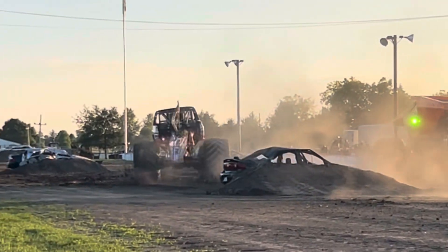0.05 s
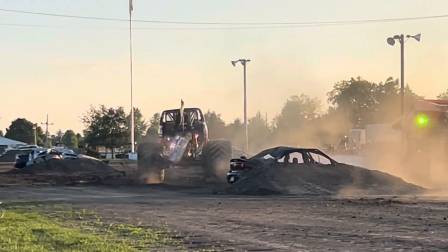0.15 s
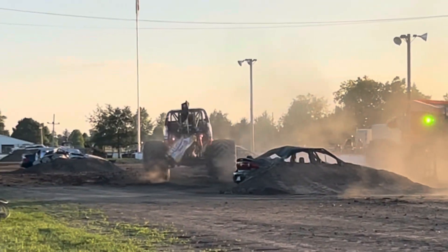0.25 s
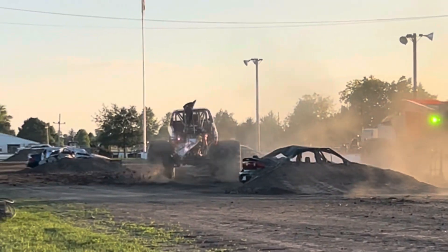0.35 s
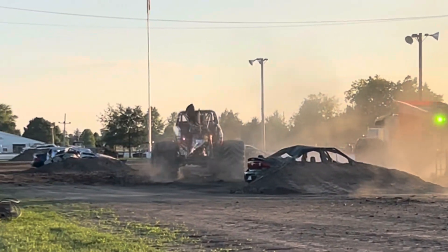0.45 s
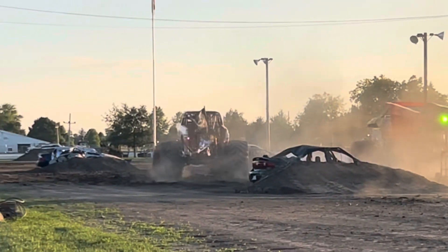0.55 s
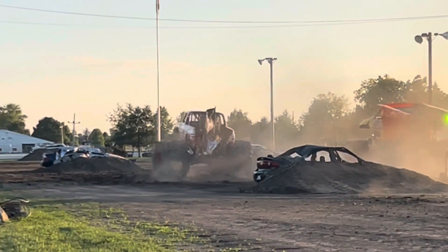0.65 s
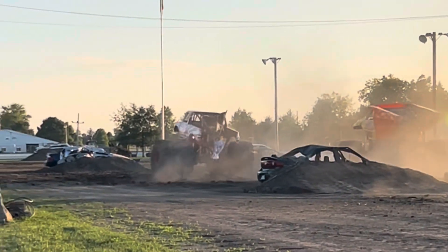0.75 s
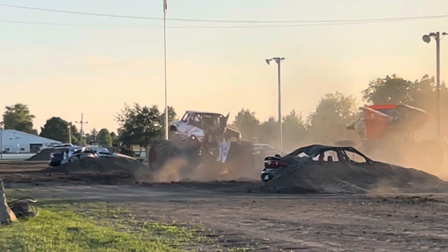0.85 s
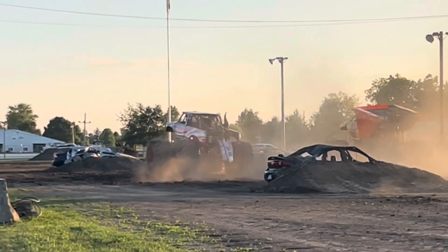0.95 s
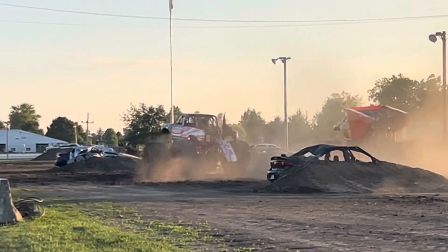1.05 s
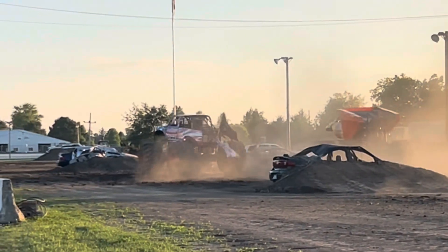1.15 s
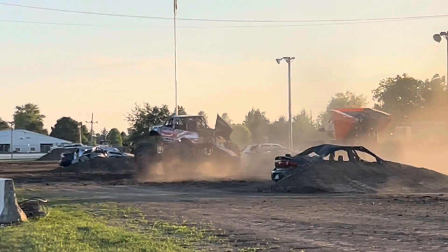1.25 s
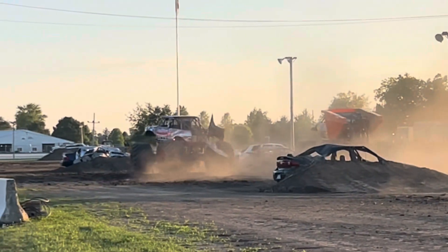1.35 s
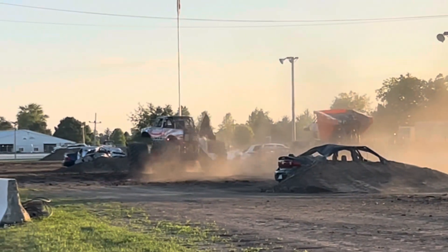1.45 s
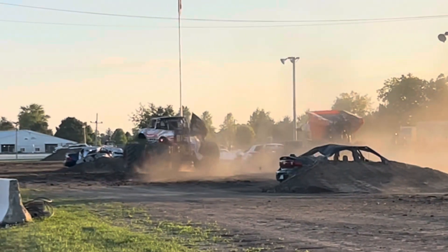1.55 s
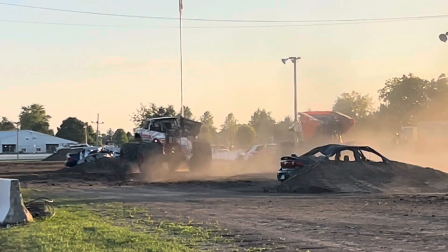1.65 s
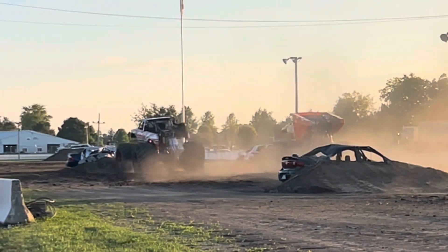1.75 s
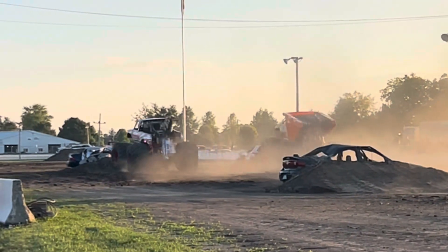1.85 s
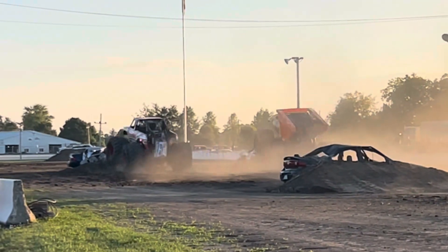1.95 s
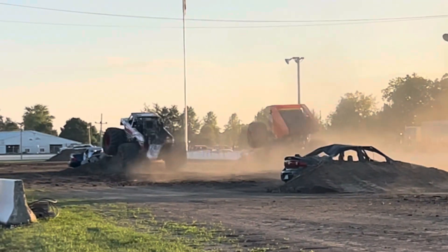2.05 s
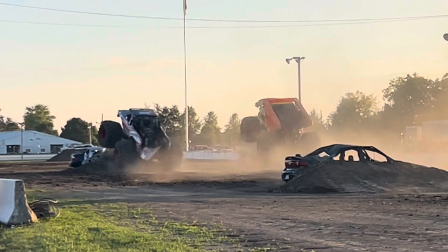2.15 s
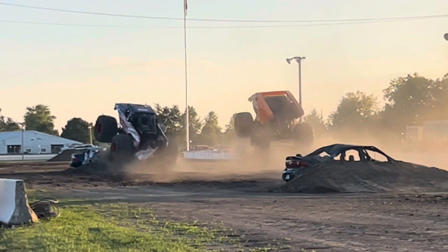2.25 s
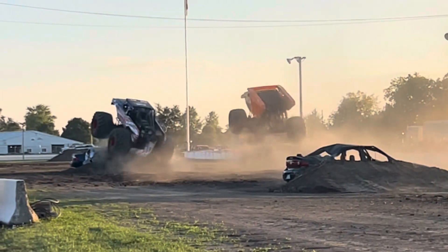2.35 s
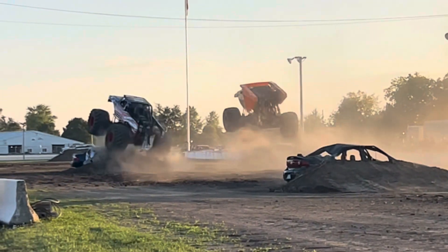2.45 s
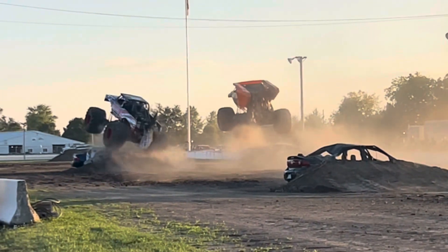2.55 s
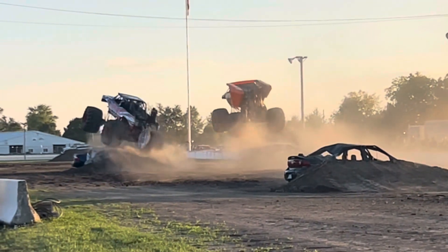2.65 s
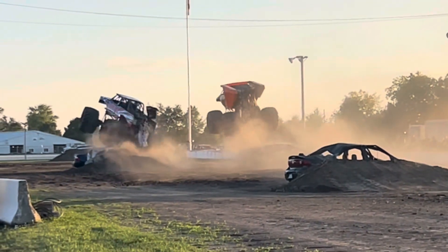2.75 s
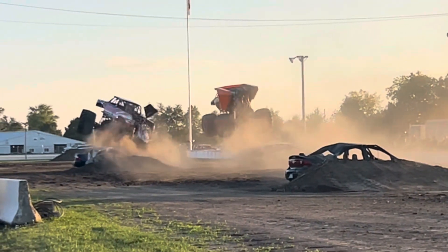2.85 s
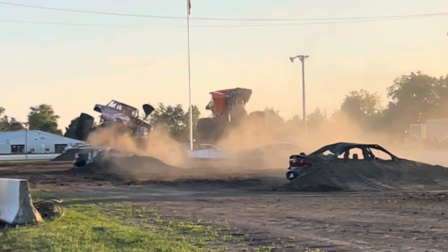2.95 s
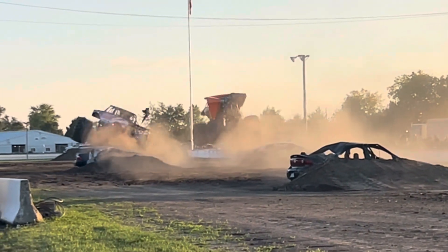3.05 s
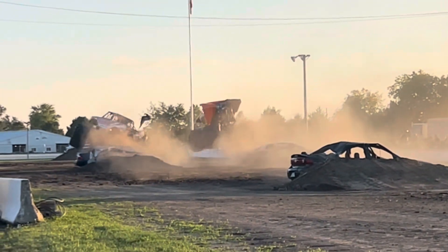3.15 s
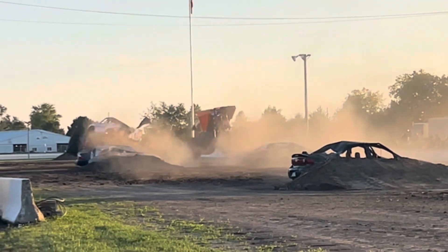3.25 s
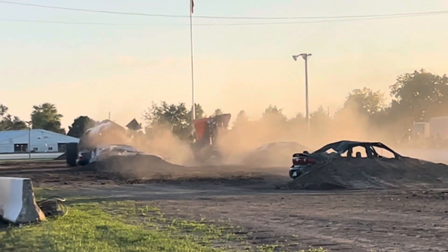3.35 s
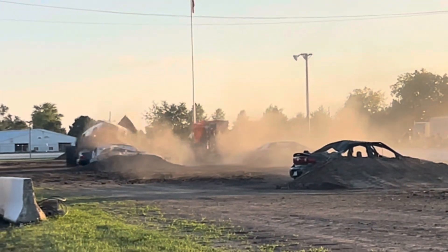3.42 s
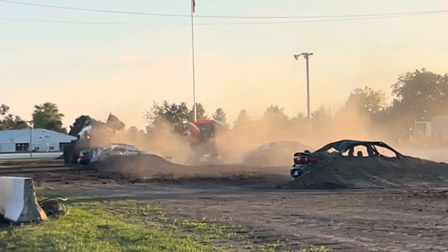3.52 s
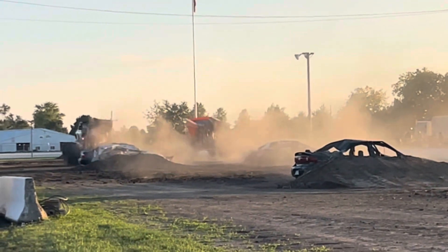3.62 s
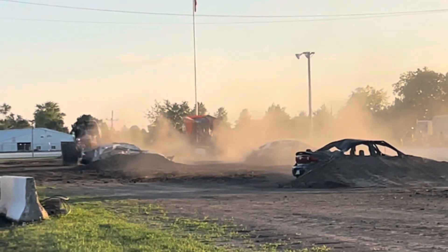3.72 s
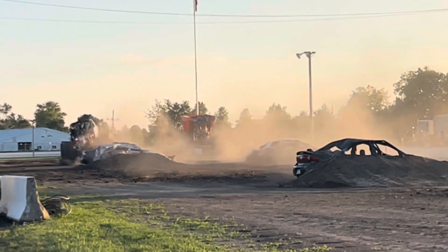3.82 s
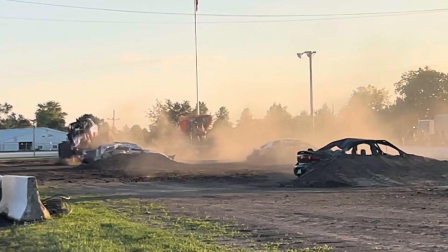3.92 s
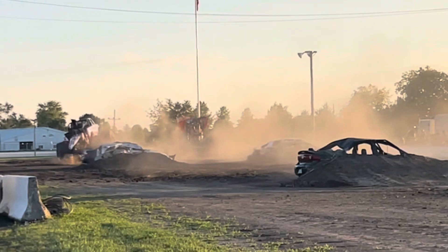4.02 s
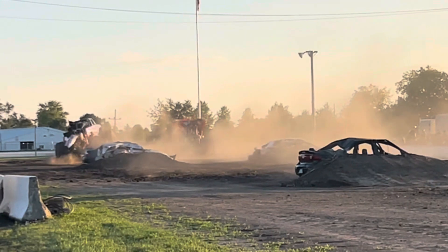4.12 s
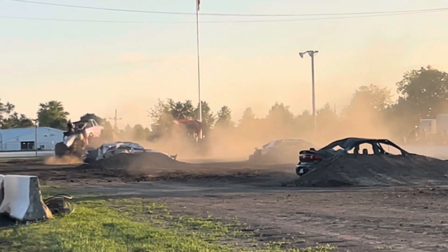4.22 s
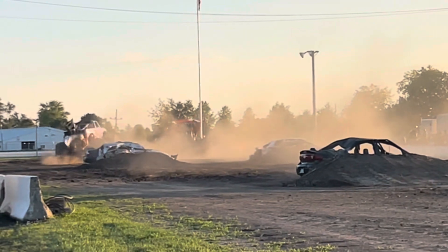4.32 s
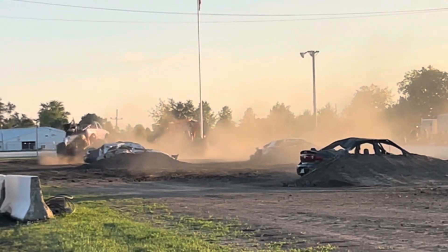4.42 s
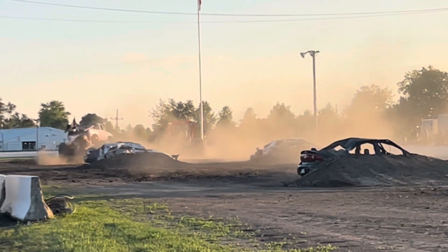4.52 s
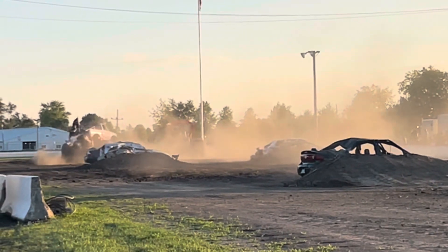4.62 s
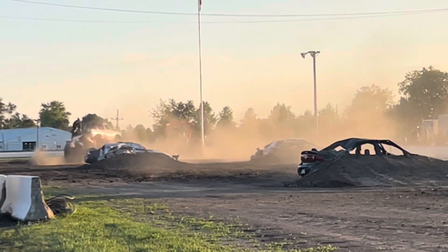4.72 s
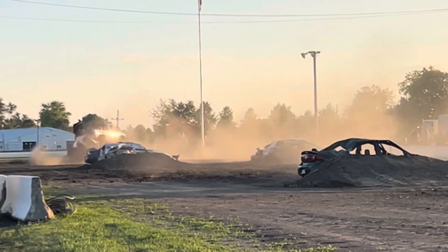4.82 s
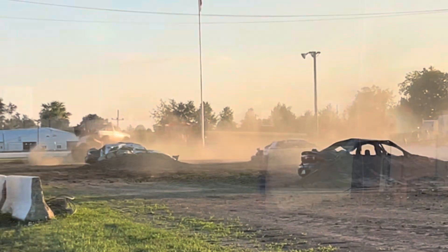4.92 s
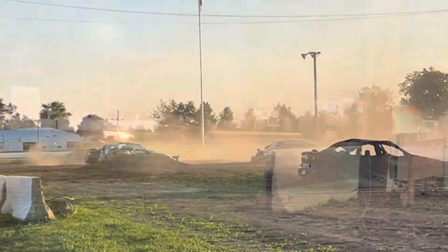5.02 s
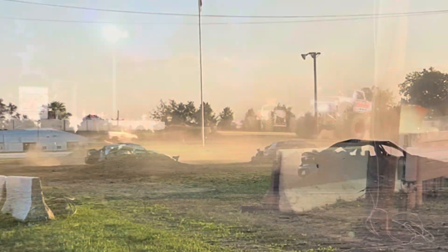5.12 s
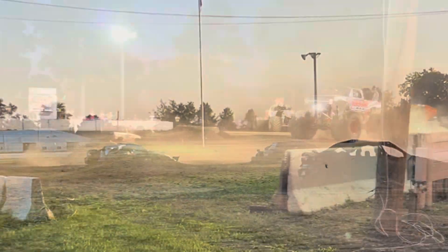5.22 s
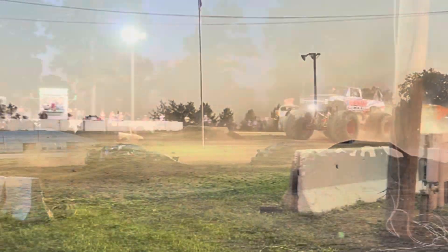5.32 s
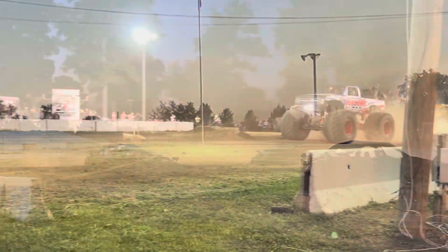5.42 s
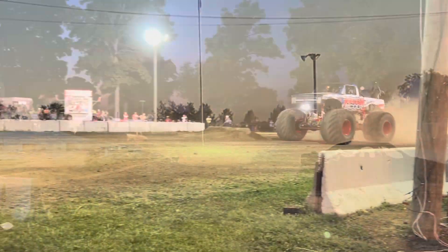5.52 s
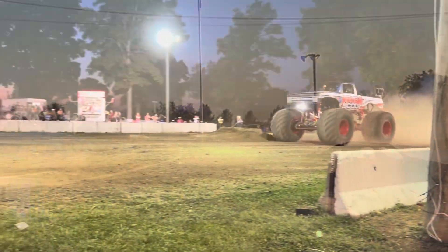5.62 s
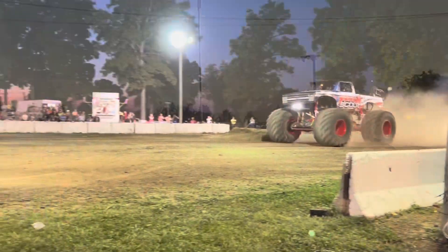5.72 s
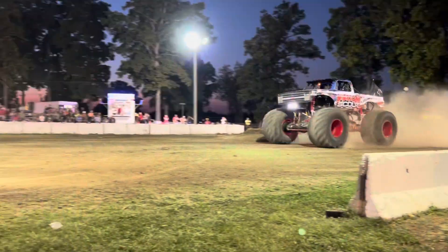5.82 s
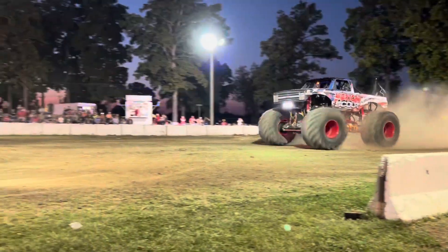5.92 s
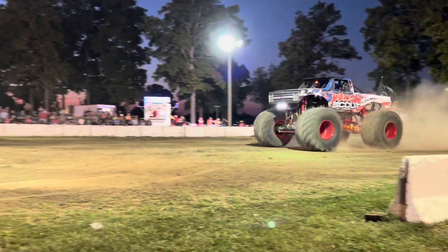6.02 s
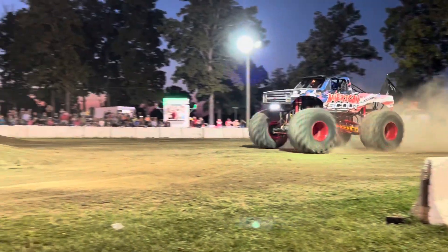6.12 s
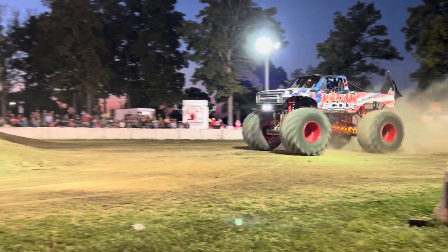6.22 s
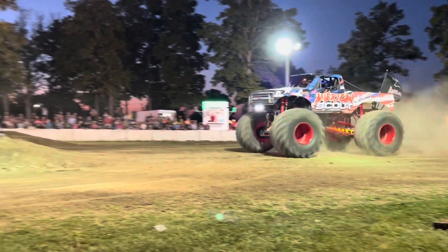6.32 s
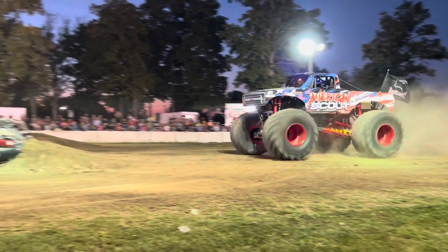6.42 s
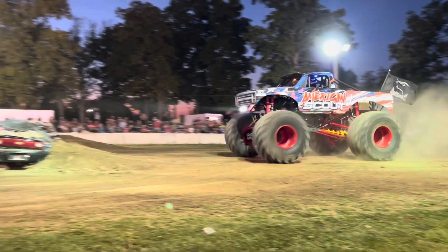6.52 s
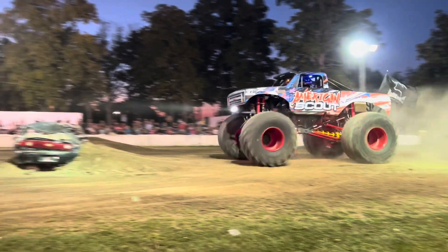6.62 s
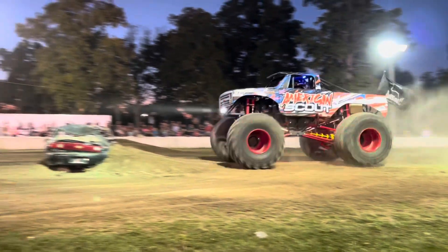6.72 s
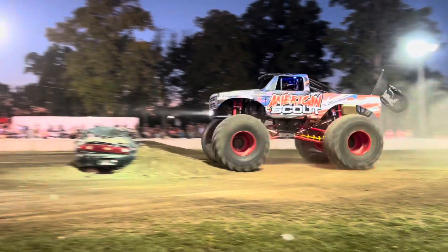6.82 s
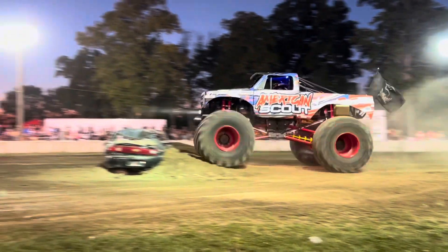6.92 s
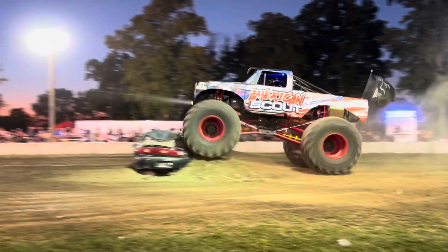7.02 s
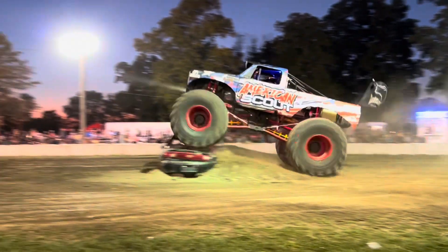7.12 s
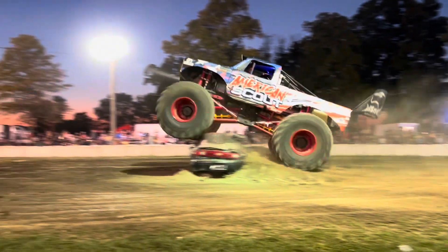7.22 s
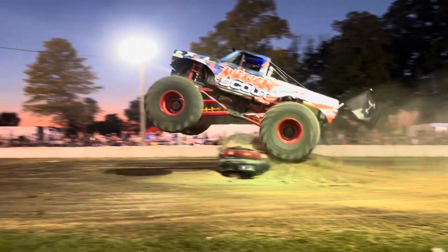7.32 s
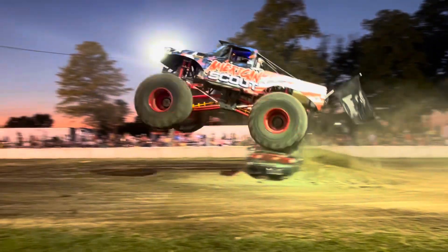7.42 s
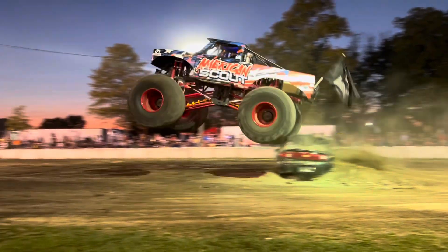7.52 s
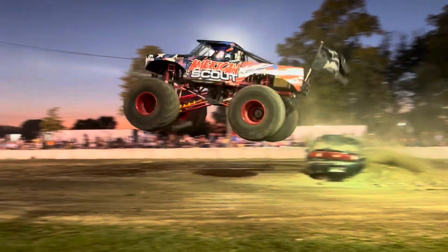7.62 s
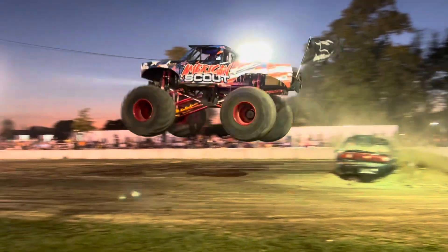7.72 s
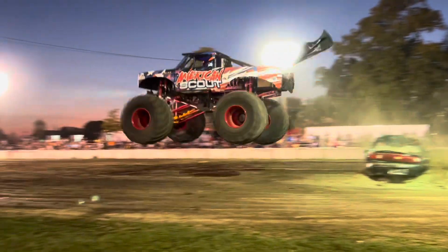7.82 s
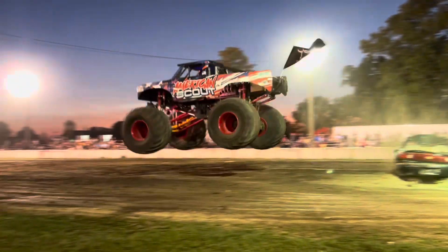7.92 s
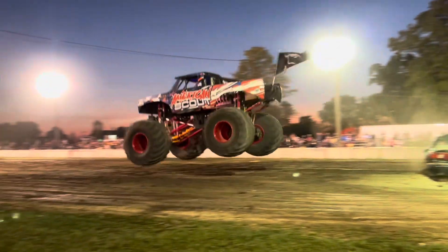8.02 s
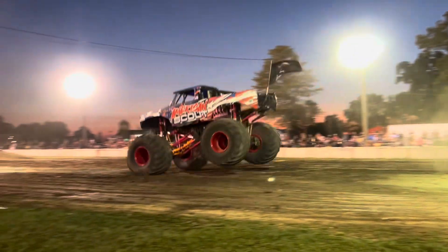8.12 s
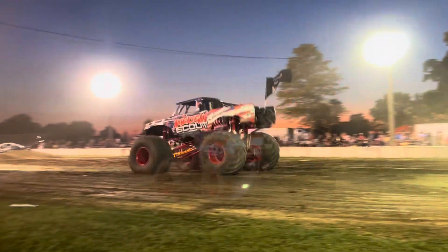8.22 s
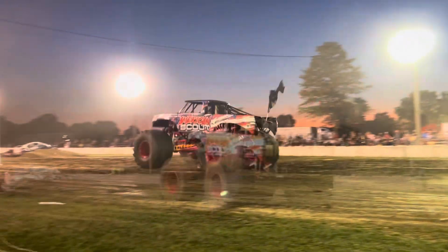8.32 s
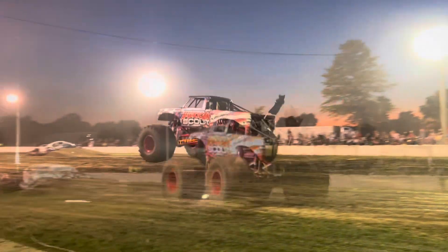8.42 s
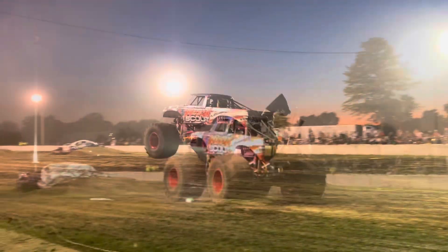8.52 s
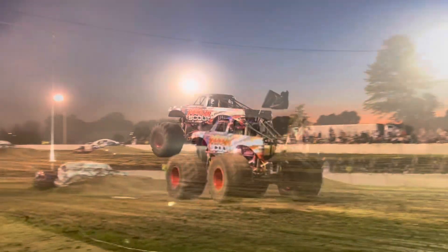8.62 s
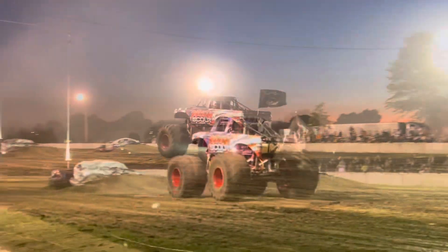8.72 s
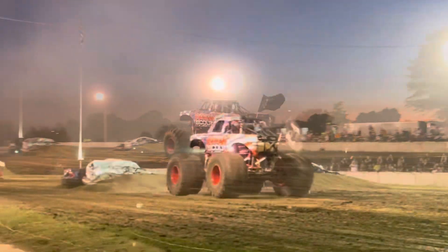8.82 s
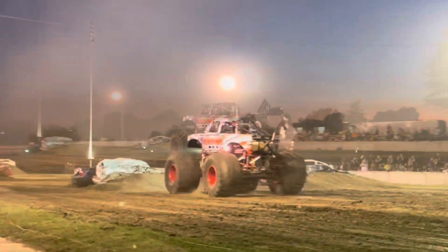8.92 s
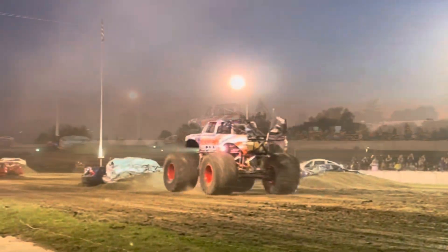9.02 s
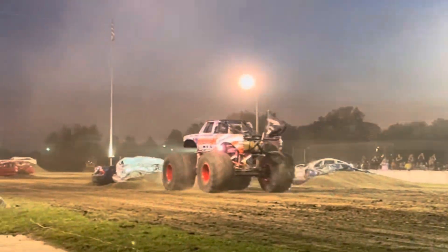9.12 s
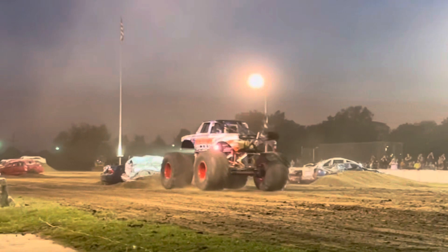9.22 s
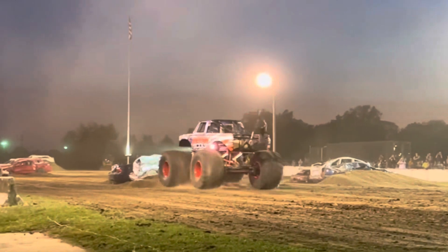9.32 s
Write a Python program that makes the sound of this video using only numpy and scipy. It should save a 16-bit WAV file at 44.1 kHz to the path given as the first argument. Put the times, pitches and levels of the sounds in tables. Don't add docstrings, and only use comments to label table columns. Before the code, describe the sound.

Outdoors at a dirt show, two open-exhaust V8 trucks race at some distance, their throttles pumping in raspy bursts before drawing off. After a quiet moment of idling, a closer truck blips, roars loudly in repeated surges through a jump, shuts off with a brief metallic pipe ring, and a fainter engine pulls away. Handheld stereo microphone, low tyre rumble and short echoes.

```python
import sys
import numpy as np
from scipy import signal
from scipy.fft import rfft, irfft
from scipy.io import wavfile
from scipy.ndimage import uniform_filter1d

SR = 44100
rng = np.random.default_rng(int(sys.argv[2]) if len(sys.argv) > 2 else 0)


def file_out(sig):
    cols = np.atleast_2d(sig).T
    lim = np.clip(cols, -1, 1)
    pcm = np.round(lim * 32767).astype(np.int16)
    wavfile.write(sys.argv[1], SR, pcm)


def convert_level_to_amplitude(level_db):
    exponent = np.asarray(level_db, float) / 20
    return 10 ** exponent


N = 412776
HZ = np.fft.rfftfreq(N, 1 / SR)
STEP_S = .002

# start_s, cycle_hz, roar_db
RIGHT_RACER = [(0.0, 37.6, -36), (0.09, 38.02, -37), (0.25, 46.2, -33), (0.42, 46.75, -29.5),
               (0.56, 43.1, -32.5), (0.84, 42.1, -38), (1.16, 48, -37), (1.36, 39.56, -44.5),
               (1.459, 42.12, -38), (1.62, 41.76, -40), (1.74, 44.84, -36), (2.021, 44.3, -39),
               (2.2, 46.8, -35.5), (2.43, 47.9, -34), (2.56, 43, -38.5), (2.66, 39.54, -45),
               (2.8, 41.52, -46), (2.899, 48.46, -35.5), (3.0, 54.07, -32.5), (3.07, 53.25, -32.5),
               (3.16, 57.4, -33.5), (3.24, 56.77, -32), (3.31, 52.57, -37.5), (3.45, 49.35, -45),
               (3.67, 45.04, -46), (3.72, 44.35, -58), (3.9, 43, -60)]
# starts_s, ends_s, cycle_hz reached, start_roar_db, end_roar_db
LEFT_PUSHES = [(0, .15, 35.3, -27, -32), (.15, .23, 34.7, -32, -31), (.23, .45, 36.86, -31, -29),
               (.45, .54, 36.7, -29, -30), (.54, .8, 35.2, -30, -31.5), (.8, .9, 35.8, -31.5, -32),
               (.9, 1.03, 39.4, -32, -27.5), (1.03, 1.14, 40.4, -28, -28.5),
               (1.14, 1.27, 38.84, -27.5, -34), (1.7, 1.82, 37.66, -35.5, -33.5),
               (1.82, 1.96, 37.7, -32.5, -35), (2.28, 2.36, 39.02, -31, -29.5),
               (2.36, 2.41, 41.14, -28.5, -27), (2.41, 2.475, 40.6, -28, -29),
               (2.6, 2.65, 32.91, -33.5, -32.5), (2.65, 2.74, 38.96, -29.5, -31.5),
               (2.74, 2.8, 41.5, -27.5, -29.5), (2.8, 2.835, 40, -28, -34), (3.09, 3.18, 41.63, -32.5, -28),
               (3.18, 3.27, 40.34, -29, -35), (3.29, 3.72, 38.5, -40.5, -36.5),
               (3.72, 3.9, 35.52, -37.5, -40), (3.9, 4.2, 27.3, -38.5, -40), (4.2, 4.86, 22.8, -41, -42)]
JUMPER_PUSHES = [(4.9, 5.44, 15.5, -50, -50), (5.455, 5.55, 20.5, -30, -30), (5.55, 5.68, 30, -30, -26.5),
                 (5.68, 5.72, 28.3, -26.5, -26), (5.72, 5.8, 37.6, -26, -21.5),
                 (5.8, 5.84, 41.3, -21.5, -21.5), (5.84, 5.872, 42.6, -21.5, -21.5),
                 (6.226, 6.29, 31.5, -24, -18.5), (6.29, 6.342, 36.3, -18.5, -24),
                 (6.404, 6.5, 43, -20, -20.5), (6.5, 6.585, 37, -20.5, -21),
                 (6.585, 6.64, 41.5, -21, -20.5), (6.64, 6.664, 42, -20.5, -20.5),
                 (6.936, 7.01, 33.5, -21, -17.5), (7.01, 7.09, 44.5, -17.5, -17),
                 (7.09, 7.16, 47, -17, -17), (7.16, 7.26, 48, -17, -17), (7.26, 7.33, 46.8, -17, -18),
                 (7.474, 7.53, 42.5, -18, -19), (7.53, 7.555, 43.5, -19, -23),
                 (7.675, 7.73, 40.5, -24, -19), (7.73, 7.782, 43, -19, -23), (7.849, 7.856, 35.4, -32, -32),
                 (7.856, 7.97, 30.6, -32, -36), (7.97, 8.09, 24.3, -50, -50), (8.09, 8.2, 23.3, -50, -50)]
LEAVER_PUSHES = [(8.25, 8.33, 22.6, -43, -39.5), (8.335, 8.385, 23.5, -37.5, -35),
                 (8.385, 8.45, 28.8, -36, -35.5), (8.465, 8.605, 22.1, -39, -42.5),
                 (8.605, 8.665, 20.9, -45, -52), (8.673, 8.7, 20.2, -42.5, -44),
                 (8.7, 8.75, 21.4, -44.5, -42.5), (8.75, 8.81, 28.2, -38.5, -36.5),
                 (8.81, 8.88, 34, -38.5, -35.5), (8.88, 8.94, 36, -36, -38), (8.94, 9.07, 37.3, -39, -44.5),
                 (9.07, 9.13, 29, -47, -46.5), (9.13, 9.17, 28, -49, -51.5), (9.21, 9.25, 30.4, -44.5, -56),
                 (9.25, 9.36, 29.5, -42.5, -47)]
# start_s, end_s, first_cycle_hz, idle_cycle_hz, coasting_lag_s
LEFT_RUN, JUMPER_RUN, LEAVER_RUN = (0, 6.5, 40.5, 29, 0.18), (4.88, 8.3, 17, 22, .13), (8.25, 9.36, 21.0, 17, .5)
# level_db at 35 Hz, rise_db_per_hz, dying_db_per_s, opening_s
LEFT_COAST, LEAVER_COAST = (-42.5, 0.64, 204, 0.05), (-81, .01, 264, 0.04)
JUMPER_COAST = (-35, .45, 400, .01)
# start_s, level_db
LEFT_NEAR = [
    (0, -1.5),
    (2.5, 0.5),
    (2.6, 2.5),
    (3.25, 0),
    (3.45, -8),
    (4.05, -15.5),
    (4.86, -19),
]
JUMPER_LEVEL = [
    (4.88, -19),
    (5.4, -25),
    (5.45, -11),
    (5.8, 0),
    (6.2, 0.5),
    (7.4, -0.5),
    (7.8, -0.5),
    (8.0, -6),
    (8.3, -5),
]
LEAVER_LEVEL = [(8.25, -21), (8.33, -13), (8.38, -1), (8.5, 1.5), (8.56, -6.5), (8.72, -10), (8.78, -2.5),
                (8.86, 0.5), (8.92, -4), (9.1, -8.5), (9.17, 1.5), (9.36, 0.5)]
# start_s, third_db, fifth_db, eighth_db
LEFT_BALANCE = [(1.961, 0, 0, -1.5), (2.06, 0, 0.00021, -8), (2.241, 0, 0, -11), (2.29, 0, 0, -1.5),
                (2.48, 0, 0, -1.5), (2.539, 0, 0, -16), (2.61, 0, 0, -14), (2.66, 0, 0, -5.5),
                (2.84, 0, 0, -3), (2.9, 0, 0, -8), (3.1, 0, 0, -7), (3.3, 0, 0, -10),
                (3.5, 0.0015, 0.00035, 0)]
RIGHT_BALANCE = [(0, -3.5, -1.5, 2), (.72, 3.5, 1, -2), (.82, -3, 0.5, 4), (1.2, -20, 2.5, -21),
                 (1.36, 0, -2, 5), (1.55, -3, 0.5, 10), (1.78, -2, 4, 3), (1.9, -9, 0, -9), (2.02, 6, 4, -4),
                 (2.15, -3, 3, 5.5), (2.27, -23, -4, 4), (2.4, -3, 4.5, -9), (2.7, 5, -13, -11),
                 (2.98, -1.5, 1.5, -6), (3.22, 3, 4.5, -8), (3.34, -4, -6, -4), (3.6, -10, 7.5, -3)]
JUMPER_BALANCE = [(5.45, -1, -5.5, 5), (5.6, 0, 0.5, 5.5), (5.9, 0, 0.5, 2), (6.1, -5, -4, -8),
                  (6.22, -2, -4, 0), (6.3, -9, 2.5, 7.5), (6.38, 2, 1, 4), (6.45, 1, 0.5, 6.5),
                  (6.52, 0.5, -1, -5), (6.58, -0.5, 0, 1), (6.65, 1.5, -1.5, -8.5), (7.0, 1.5, 0.5, -3),
                  (7.18, -0.5, -0.5, 0), (7.27, -2.5, -0.5, -2), (7.46, 0.5, 1.5, -7), (7.51, 1, -5, 2),
                  (7.56, 0, -3, -1), (7.67, -2, 1.5, -6), (7.72, -1.5, -1, 1), (7.78, -1.5, 1.5, 3),
                  (7.9, 1.5, 3.5, -8), (8.1, 0, 0, -6)]
LEAVER_BALANCE = [(8.45, 3, 0.5, 2.5), (8.6, -2, -1.5, 6.5), (8.75, -2, 0, 5.5), (8.82, -2, 0, -5),
                  (8.9, 5.5, 4, 5), (9.0, 0, -1, 5), (9.15, -2, 1, -3)]
# level_db at 35 Hz and roar -30 dB, rise_db_per_hz, rise_db_per_roar_db
LEFT_ORDERS = [(-43, 1, 2), (-41.5, 1.1, 0.9), (-32, -0.24, 1.4)]
RIGHT_ORDERS = [(-32, 0.34, 0.96), (-28.5, 0.32, 0.91), (-40, .01, 1)]
JUMPER_ORDERS = [(-23, 0.53, 0.46), (-15, 0.19, 0.36), (-39.5, -0.24, 1.13)]
LEAVER_ORDERS = [(-40, 0.32, 0.3), (-25, -0.23, 0.74), (-38, 0.024, 0.65)]
# centre_hz, width_hz, level_db
LEFT_HEADER, RIGHT_HEADER = (283.4, 46, 9.2), (338, 68, 5.8)
JUMPER_HEADER, LEAVER_HEADER = (279, 84, 7.1), (166.3, 18, 18)
# order, level_db to the mean of the main ones
FAR_UPPER = [(4, -9), (6, -29), (7, -14), (10, -24), (11, -4.5), (13, -11), (16, -14.5), (19, -23),
             (21, -36), (24, -22)]
NEAR_UPPER = [(4, -16), (6, -11), (7, -12), (9, -12), (10, -9), (11, -2.5), (13, -2), (15, -12), (16, -1.5),
              (19, -5), (21, -8), (24, -8), (27, -10)]
LAST_UPPER = [(4, -10), (6, -1), (7, -11), (9, -7), (10, 2), (12, 0), (13, -5), (17, -12)]
NEARER_BANK = [1, 0, 0, 1, 0, 1, 1, 0]
# pitch_hz, level_db
FAR_PIPE = [(30, -24), (80, -16), (150, -1), (320, 7.5), (420, -5), (650, -9), (1300, -54), (3000, -27),
            (8000, -22)]
NEAR_PIPE = [(30, -23), (80, -2), (150, 10), (300, -1.5), (420, -13), (620, 4), (1300, -29), (3000, -30),
             (8000, -44)]
# pitch_hz, level_db
FAR_BARK = [(220, -4), (380, 1.5), (456, 0.5), (503, -3), (687, -9), (1100, -25.5), (1430, -39),
            (2420, -120)]
NEAR_BARK = [(220, -28), (380, 3), (415, -1), (507, 4), (555, -6), (1100, -7), (1430, -4), (2420, -120)]
LAST_BARK = [(220, -26), (380, 3.5), (507, -12), (774, -0.5), (1100, -7), (1430, -15), (2420, -120)]
# pitch_hz, level_db
FAR_RASP = [(530, -22), (900, -1.5), (1860, -0.5), (2190, -3.5), (2450, -2), (4960, -11.5), (7410, -16.5),
            (8230, -15.5), (8800, -24), (11400, -93), (19400, -120)]
NEAR_RASP = [(530, -4), (900, -3), (1360, -5), (1660, -5), (2210, -6), (5160, -14), (6120, -19.5),
             (8230, -15.5), (8800, -25), (11400, -102), (19400, -120)]
# pitch_hz, level_db
SIZZLE = [(8800, -1), (9400, -2), (10300, -2.5), (11400, 0), (12400, 1), (13400, -2), (14500, -2),
          (15500, -3), (15950, -5)]
# bark_db over rasp, bark_db_per_db, sizzle_db over rasp, sizzle_db_per_db
FAR_MIX, NEAR_MIX = (0.5, -0.62, -15.5, 0.23), (-0.5, -0.1, -16.5, 0.23)
LAST_MIX = (5, 0.25, -10, 0.23)
# start_s, level_db
FAR_GROUND = [(0.0, -23.5), (0.54, -30.5), (1.5, -26), (1.84, -25), (2.79, -25), (3.15, -28.5),
              (3.28, -30.5), (4.33, -33), (4.86, -40)]
NEAR_GROUND = [
    (4.88, -33.5),
    (5.05, -31),
    (5.37, -31),
    (5.5, -19),
    (5.73, -17.5),
    (7.19, -18.5),
    (8.2, -30.5),
    (8.42, -30.5),
    (9.36, -30),
]
# pitch_hz, level_db
FAR_RUMBLE = [(12, -55), (20, -40), (61, -4), (124, 4), (161, -2), (232, 3), (450, -12), (580, -15.5),
              (990, -120)]
NEAR_RUMBLE = [(20, -53), (50, -10), (80, -1.5), (160, 3), (300, -13.5), (380, -25), (450, -30)]
# pitch_hz, level_db
FAIRGROUND = [(280, -40), (480, -18), (543, -5), (574, -11.5), (831, -3), (1030, -34), (2470, -15.5),
              (7000, -31), (9100, -64), (15400, -120)]
# start_s, level_db
FAIRGROUND_DB = [(0, -53), (5.44, -55.5)]
# delay_s, level_db
ECHOES = [(0.02, -12.5), (0.047, -27), (0.083, -20), (0.133, -25.5)]
# start_s, level_db
WHINE = [
    (7.79, -31),
    (7.845, -43),
    (7.852, -24),
    (7.89, -33),
    (7.92, -41),
    (7.96, -34),
    (8.02, -51),
    (8.08, -51),
    (8.14, -41),
    (8.21, -54),
]
# start_s, left_over_right_db
PAN = [
    (0, 3.4),
    (4.2, 3.2),
    (5.1, 0),
    (9.36, .2),
]
# pitch_hz, left_lead_radians
PORT_PHASE = [(0, 0), (2500, .1), (4200, .6), (5200, .9), (5600, -.7), (6300, -.8), (7000, -.3),
              (7600, -.85), (8800, -1.5), (10100, -3.14), (11400, -4.7), (12400, -5.4), (13500, -6.3),
              (15000, -7.8), (16000, -8.6)]
# pitch_hz, left_over_right_db
PORT_BALANCE = [(60, -0.5), (180, -1.0), (550, -3.6), (1650, 0.0), (4970, 0.0), (15000, 0.0)]
# pitch_hz, level_db
SCATTER = [(20, -32), (120, -27), (300, -24), (700, -13), (1800, -14), (2500, -22), (4500, -11), (9000, -8),
           (16000, -9)]
# low_hz, high_hz
MID_GAPS = [(9300, 10800), (15850, 23000)]
SIDE_GAPS = [(2100, 7600), (12500, 14400), (15850, 23000)]
# low_hz, high_hz, far_time_share, near_time_share
FLICKER = [(2800, 3400, .5, .45), (3400, 4150, .4, .3), (4150, 5400, .04, .95), (5500, 6400, .04, .97)]


def rms_one(x):
    return x / np.sqrt(np.mean(x ** 2) + 1e-20)


def in_time(rows):
    s, *columns = np.transpose(rows)
    return [np.interp(np.arange(N) / SR, s, c) for c in columns]


def present(rows):
    t = np.arange(N) / SR
    return np.clip(1 + np.minimum(t - rows[0][0], rows[-1][0] - t) / .02, 0, 1)


def at_hz(points):
    hz, value = np.transpose(points)
    return np.interp(np.log(HZ + 1), np.log(hz + 1), value)


def colour(x, points):
    inside = (HZ > points[0][0]) & (HZ < points[-1][0])
    return irfft(rfft(x) * convert_level_to_amplitude(at_hz(points)) * inside, N)


def drift(rate):
    r = np.exp(-80 * np.pi * rate / SR)
    slow = signal.lfilter([1], [1, -2 * r, r * r], rng.standard_normal(N // 40 + 2002))[2000:]
    return np.interp(np.arange(N) / 40, np.arange(len(slow)), rms_one(slow))


def driven(pushes, run, coast, near):
    start, end, speed, idle_hz, lag = run
    coast_db, per_hz, dies, opening = coast
    t = np.arange(start, end, STEP_S)
    hz, blast_db, shut = np.zeros(len(t)), np.full(len(t), -99.), start

    def sag(s):
        return idle_hz + (speed - idle_hz) * np.exp(-np.maximum(s - shut, 0) / lag)

    for opens, shuts, aim_hz, first_db, last_db in pushes:
        hz = np.where(t >= shut, sag(t), hz)
        hz = np.where(t >= opens, np.interp(t, [opens, shuts], [sag(opens), aim_hz]), hz)
        times, levels = [opens - opening, opens, shuts], [first_db - 20, first_db, last_db]
        push_db = np.interp(t, times, levels, left=-99)
        blast_db = np.maximum(blast_db, push_db - dies * np.maximum(t - shuts, 0))
        speed, shut = aim_hz, shuts
    hz = uniform_filter1d(np.where(t >= shut, sag(t), hz), size=9)
    near_db = np.interp(t, *np.transpose(near))
    return t, hz, np.maximum(blast_db, coast_db + per_hz * (hz - 35)), near_db


def order_rows(t, hz, roar_db, near_db, laws, balance, header, shaded_db=0, hush=0):
    effort_db = uniform_filter1d(roar_db, size=10, origin=4) + 30
    speed = np.minimum(hz, 43) - 35
    s, *balance_db = np.transpose(balance)
    third, fifth, eighth = [
        db + per_hz * speed + share * effort_db + near_db + np.interp(t, s, shift_db)
        for (db, per_hz, share), shift_db in zip(laws, balance_db)]
    eighth += hush * np.minimum(effort_db - 4, 0) * np.clip((8 * hz - 200) / 60, 0, 1)
    centre_hz, width_hz, gain_db = header
    eighth += gain_db * np.exp(-((8 * hz - centre_hz) / width_hz) ** 2)
    fifth = fifth + shaded_db * np.clip(0.55 + effort_db / 14, .65, 1)
    return np.transpose([t, hz, third, fifth, eighth])


def roar_rows(t, effort_db, mix, near_db=0, dull_db=0):
    bark_db, bark_slope, sizzle_db, sizzle_slope = mix
    bark_db = np.minimum(bark_db + bark_slope * (effort_db + 30), 5.5)
    sizzle_db = sizzle_db + sizzle_slope * (effort_db + 30) + dull_db
    return np.transpose([t, effort_db + near_db, bark_db, sizzle_db])


def drivers():
    left = driven(LEFT_PUSHES, LEFT_RUN, LEFT_COAST, LEFT_NEAR)
    jumper = driven(JUMPER_PUSHES, JUMPER_RUN, JUMPER_COAST, JUMPER_LEVEL)
    leaver = driven(LEAVER_PUSHES, LEAVER_RUN, LEAVER_COAST, LEAVER_LEVEL)
    s, hz, roar_db = np.transpose(RIGHT_RACER)
    t = np.arange(0, s[-1], STEP_S)
    right = t, np.interp(t, s, hz), np.interp(t, s, roar_db), 0
    turned = np.clip((jumper[0] - 7.02) / 0.082, 0, 1)
    engines = (order_rows(*left, LEFT_ORDERS, LEFT_BALANCE, LEFT_HEADER),
               order_rows(*right, RIGHT_ORDERS, RIGHT_BALANCE, RIGHT_HEADER),
               order_rows(*jumper, JUMPER_ORDERS, JUMPER_BALANCE, JUMPER_HEADER, -11 * turned, 1.7 * turned),
               order_rows(*leaver, LEAVER_ORDERS, LEAVER_BALANCE, LEAVER_HEADER))

    idle_from_s, idle_to_s, idle_db = 4.89, 5.45, -46
    t = np.arange(0, idle_to_s, STEP_S)
    left_db = np.interp(t, left[0], left[2] + left[3])
    right_db = np.interp(t, right[0], right[2], right=-99)
    waiting_db = idle_db - 300 * np.maximum(idle_from_s - t, 0)
    far_db = np.maximum(np.maximum(left_db, right_db), waiting_db)
    dulling_db = np.maximum(-3.3 * t, -12)
    far = roar_rows(t, far_db, FAR_MIX, 0, dulling_db)
    near = roar_rows(jumper[0], jumper[2], NEAR_MIX, jumper[3])
    near = near[(near[:, 0] > idle_to_s) & (near[:, 0] < leaver[0][0])]
    return engines, (far, near, roar_rows(leaver[0], leaver[2], LAST_MIX))


def throttle_db(roars):
    rasp_db, bark_db, _ = in_time(np.vstack(roars))
    return uniform_filter1d(rasp_db + bark_db, size=800)


def engine(rows, open_db, upper, pipe, pulse_db, far_bank_db, uneven_db, wobble_db, upper_db, dip_db=0):
    cycle_hz, *order_db = in_time(rows)
    cycles = np.cumsum(cycle_hz) / SR
    orders = list(zip((3, 5, 8), order_db))
    thinning_db = 1.5 * np.maximum(cycle_hz - 47.4, 0)
    body_db = np.mean(order_db, axis=0) + upper_db - thinning_db
    edge_db = np.minimum(body_db, open_db - 3.5)
    for order, db in upper:
        order_hz = order * cycle_hz
        low_share = np.clip((380 - order_hz) / 150, 0, 1)
        level_db = edge_db + (body_db - edge_db) * low_share + db
        if order > 8:
            level_db = level_db - dip_db * np.exp(-((order_hz - 420) / 70) ** 2)
        orders.append((round(order), level_db))

    level_wobble = [drift(7.2) for _ in range(4)]
    phase_wobble = [drift(10.0) for _ in range(4)]
    tones = np.zeros(N)
    for k, db in orders:
        level = np.sqrt(2) * convert_level_to_amplitude(db + wobble_db * (k / 5) ** .5 * level_wobble[k % 4])
        phase = 2 * np.pi * k * cycles + k * k + .04 * wobble_db * k * phase_wobble[k % 4]
        tones += level * np.sin(phase)

    firing = (8 * cycles + .08 * drift(60)).astype(int)
    fired = np.flatnonzero(np.diff(np.maximum.accumulate(firing)) > 0)
    strength_db = far_bank_db * (1 - np.take(NEARER_BANK, firing[fired], mode="wrap"))
    clicks = np.full(N, 1e-18)
    clicks[fired] = convert_level_to_amplitude(strength_db + uneven_db * rng.standard_normal(len(fired)))
    effort = np.sqrt(uniform_filter1d(sum(convert_level_to_amplitude(2 * db) for db in order_db), size=1500))
    steady = clicks / np.sqrt(cycle_hz)
    pulses = convert_level_to_amplitude(pulse_db) * effort * rms_one(colour(steady, pipe))
    blasts = signal.lfilter([1], [1, -np.exp(-1 / (0.0056 * SR))], clicks)
    return (tones + pulses) * present(rows), blasts * effort * present(rows)


def roar(rows, blasts, bark, rasp, gated, smooth_below_db, patchy_db, bark_share_db=-5.0):
    rasp_db, bark_db, sizzle_db = in_time(rows)
    gate = blasts / np.sqrt(uniform_filter1d(blasts ** 2, size=3000) + convert_level_to_amplitude(2 * smooth_below_db))
    gas = rng.standard_normal(N) * (1 + gated * gate)
    gas /= np.sqrt(uniform_filter1d(gas ** 2, size=4000))

    def layer(points, db):
        return convert_level_to_amplitude(db + patchy_db * drift(22.0)) * rms_one(colour(gas, points))

    out = layer(rasp, rasp_db - 0.26)
    out += layer(bark, rasp_db + bark_db + bark_share_db)
    out += layer(SIZZLE, rasp_db + sizzle_db + 2.0)
    return out * present(rows)


def ground(rows, spectrum, share_db):
    level = convert_level_to_amplitude(in_time(rows)[0] + share_db + 2 * drift(7.4))
    return level * rms_one(colour(rng.standard_normal(N), spectrum)) * present(rows)


def arena(x):
    dull = signal.sosfilt(signal.butter(1, 1500, fs=SR, output="sos"), x)
    return sum(convert_level_to_amplitude(db) * np.pad(dull, (round(s * SR), 0))[:N] for s, db in ECHOES)


def crackle():
    since = np.arange(N) / SR - 5.368
    gas = rng.standard_normal(N)
    bright = rms_one(colour(gas, NEAR_RASP)) + convert_level_to_amplitude(5.0) * rms_one(colour(gas, SIZZLE))
    return convert_level_to_amplitude(-43) * bright * (since > 0) * np.exp(-np.maximum(since, 0) / .02)


def whine():
    phase = 2 * np.pi * 564 * np.arange(N) / SR + .9 * drift(25)
    return np.sqrt(2) * convert_level_to_amplitude(in_time(WHINE)[0]) * np.sin(phase) * present(WHINE)


def ports(x):
    half = convert_level_to_amplitude(at_hz(PORT_BALANCE) / 2) * np.exp(.5j * at_hz(PORT_PHASE))
    mid, side = irfft(rfft(x) * np.array([half + 1 / half, half - 1 / half]) / 2, N)
    side += colour(x * drift(90), SCATTER)
    low = signal.sosfilt(signal.butter(4, 1900, fs=SR, output="sos"), mid)
    side += low * (convert_level_to_amplitude(in_time(PAN)[0]) - 1) / 2
    return np.array([mid + side, mid - side])


def scene():
    (left, right, jumper, leaver), roars = drivers()
    far_roar, near_roar, last_roar = roars
    open_db = throttle_db(roars)
    left, left_blasts = engine(left, open_db, FAR_UPPER, FAR_PIPE, pulse_db=-9, far_bank_db=-1.5,
                               uneven_db=4.5, wobble_db=1.2, upper_db=-1)
    right, right_blasts = engine(right, open_db, FAR_UPPER, FAR_PIPE, pulse_db=-9, far_bank_db=-4,
                                 uneven_db=4.5, wobble_db=1.8, upper_db=5)
    jumper, jumper_blasts = engine(jumper, open_db, NEAR_UPPER, NEAR_PIPE, pulse_db=-15, far_bank_db=-7,
                                   uneven_db=3, wobble_db=.7, upper_db=-1.5, dip_db=10)
    leaver, leaver_blasts = engine(leaver, open_db, LAST_UPPER, FAR_PIPE, pulse_db=-5.5, far_bank_db=-3.5,
                                   uneven_db=8.5, wobble_db=2.0, upper_db=2.5, dip_db=19)
    blasts = left_blasts + right_blasts + jumper_blasts + leaver_blasts

    far = left + right + roar(far_roar, blasts, FAR_BARK, FAR_RASP,
                              gated=0.73, smooth_below_db=-11, patchy_db=-0.92)
    near = jumper + crackle() + whine()
    near += roar(near_roar, blasts, NEAR_BARK, NEAR_RASP,
                 gated=1.7, smooth_below_db=-30, patchy_db=1.2, bark_share_db=-7.5)
    last = leaver + roar(last_roar, blasts, LAST_BARK, NEAR_RASP,
                         gated=0.44, smooth_below_db=-23, patchy_db=0.3)
    dirt = ground(FAR_GROUND, FAR_RUMBLE, share_db=-7.0)
    dirt += ground(NEAR_GROUND, NEAR_RUMBLE, share_db=-6)
    dirt += ground(FAIRGROUND_DB, FAIRGROUND, share_db=0.5)
    echoes = convert_level_to_amplitude(-4.5) * arena(far + last) + convert_level_to_amplitude(-19.0) * arena(jumper)
    return ports(far + near + last + dirt + echoes)


def outside(gaps):
    return np.prod([(HZ < low) | (HZ > high) for low, high in gaps], axis=0)


def thin_stereo(pair):
    mid, side = rfft(np.array([pair[0] + pair[1], pair[0] - pair[1]]) / 2)
    kept = irfft(side * outside(SIDE_GAPS), N)
    frame = np.arange(N) // 2048
    is_far = frame * 2048 < 4.87 * SR
    for low, high, far_share, near_share in FLICKER:
        on = rng.random(N // 2048 + 1)[frame] < np.where(is_far, far_share, near_share)
        band = irfft(side * (1 - outside([(low, high)])), N)
        kept += uniform_filter1d(on * 1., size=512) * band
    mid = irfft(mid * outside(MID_GAPS), N)
    return np.array([mid + kept, mid - kept])


def low_pass(x):
    return signal.sosfilt(signal.butter(12, 15950, fs=SR, output="sos"), x)


def record(dry):
    rounded = .97 * np.tanh(dry / .97)
    mix = thin_stereo(rounded)
    return low_pass(mix)


dry = scene()
out = record(dry)
file_out(out)
```